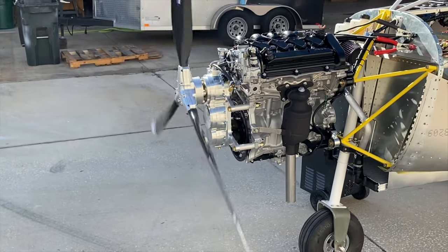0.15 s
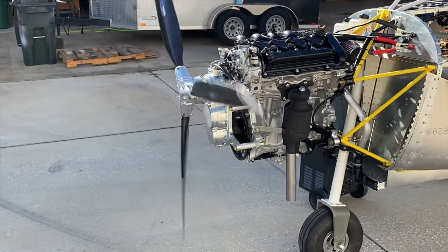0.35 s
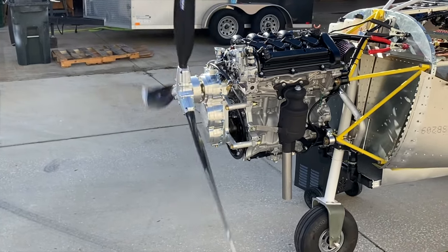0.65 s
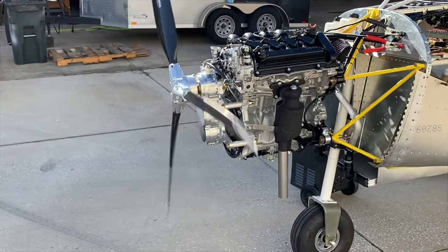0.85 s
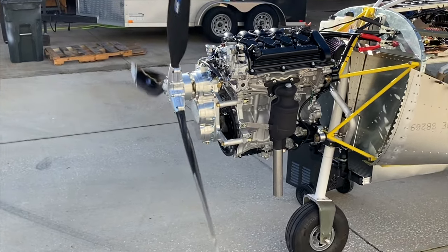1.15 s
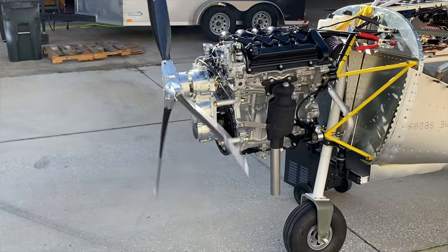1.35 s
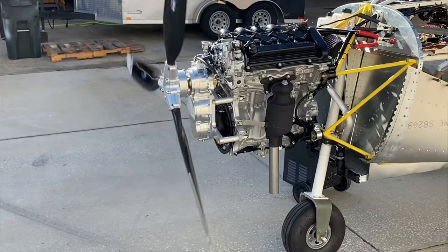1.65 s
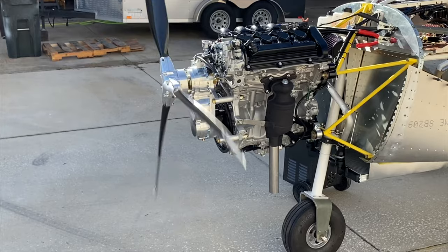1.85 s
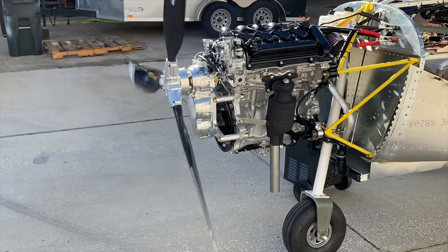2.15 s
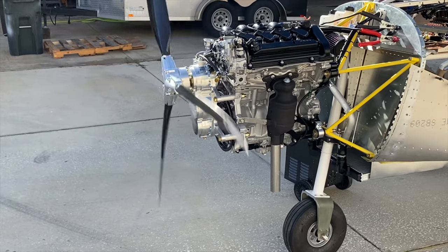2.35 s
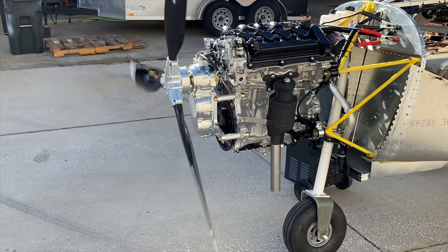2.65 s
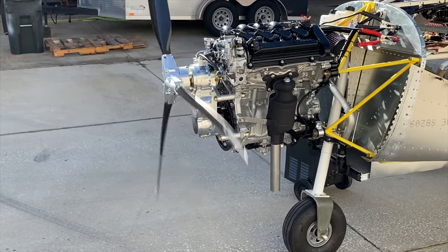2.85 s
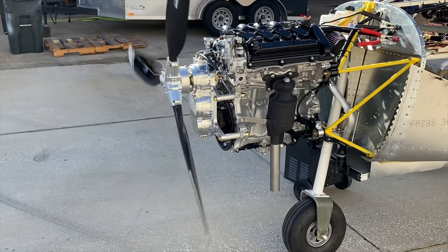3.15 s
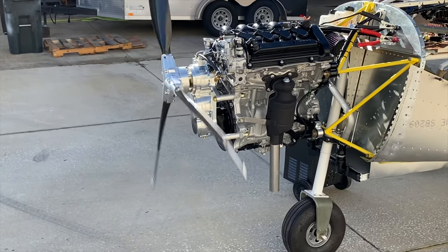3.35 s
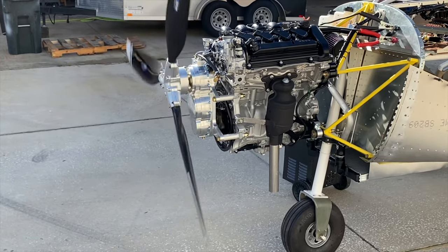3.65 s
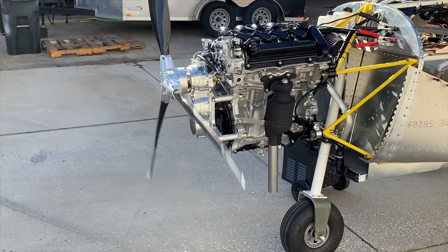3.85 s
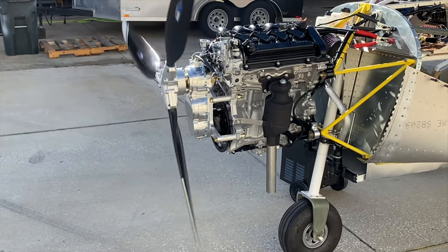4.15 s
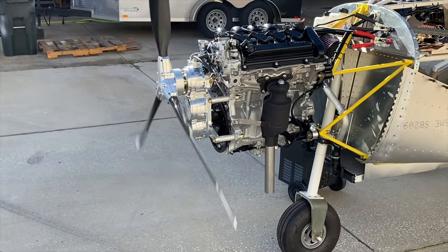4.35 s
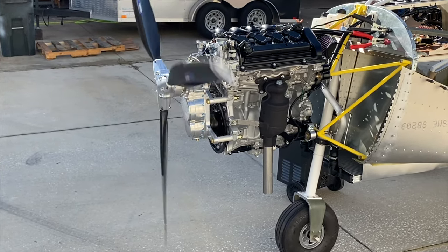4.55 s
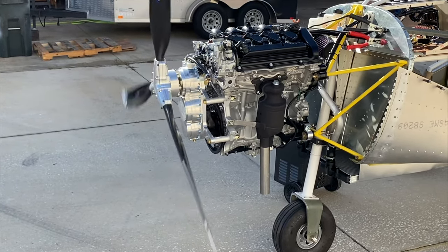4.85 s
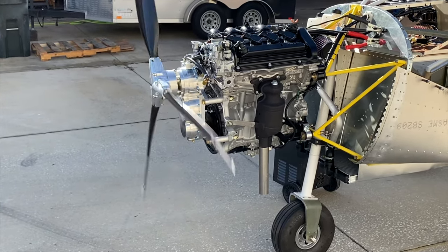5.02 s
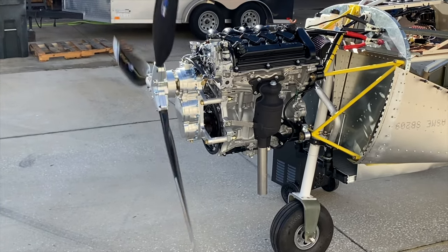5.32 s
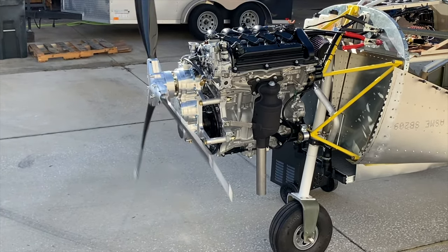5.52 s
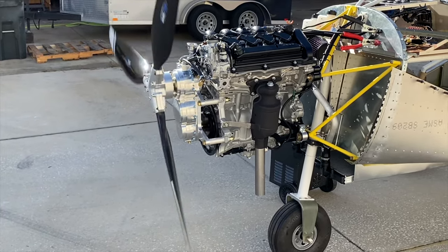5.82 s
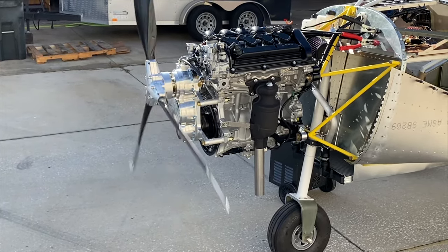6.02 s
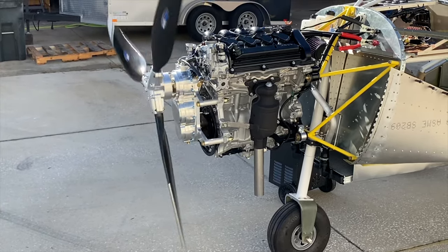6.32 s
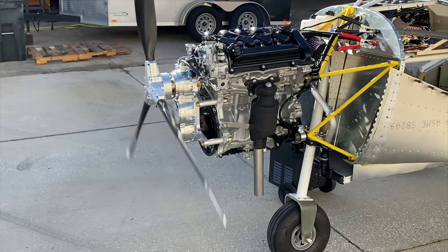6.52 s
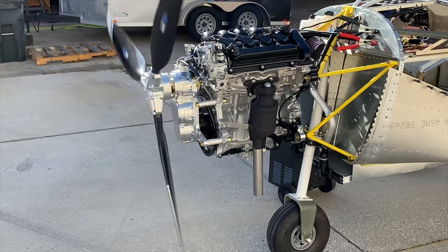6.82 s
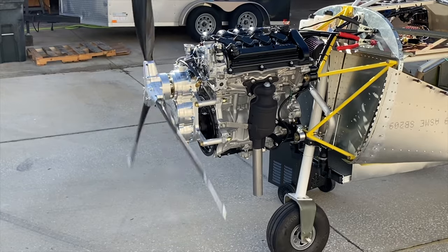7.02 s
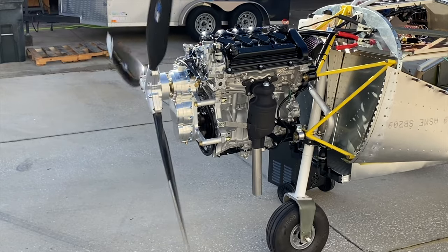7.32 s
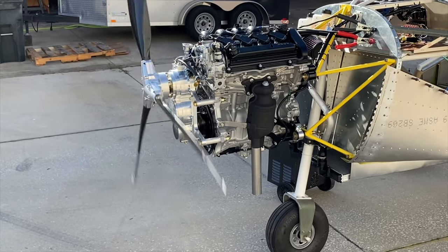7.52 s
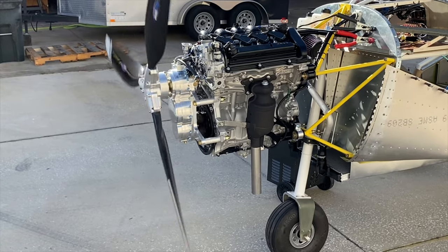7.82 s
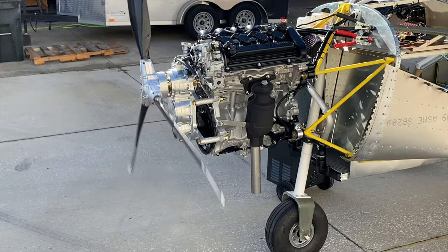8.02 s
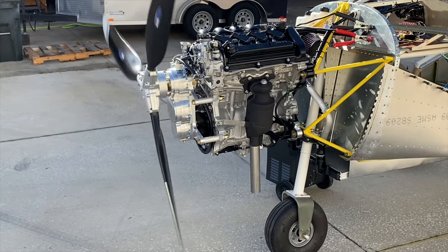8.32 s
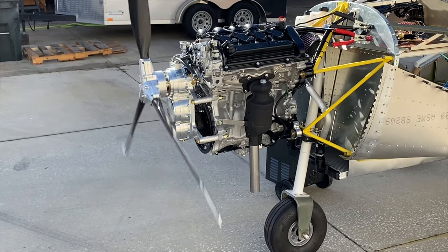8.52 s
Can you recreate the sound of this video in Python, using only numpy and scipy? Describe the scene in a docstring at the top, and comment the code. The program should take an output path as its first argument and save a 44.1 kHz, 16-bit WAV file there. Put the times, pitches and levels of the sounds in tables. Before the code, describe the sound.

From 0 to about 8.7 seconds, a geared four-cylinder aircraft engine idles without starting, revving or stopping, its speed hunting only very slightly. Exhaust pulses come at about 49 a second, fusing into a low, throaty drone with a strong octave and wavering upper hum, roughened by breathy gas bursts and uneven pulses. Above it runs dense metallic clatter: valves, rapid knocks, limping taps, hissy injector ticks, thin whines and a gear rasp stronger near 1.75 and 4 seconds. The three-blade propeller gives a fast, soft whoosh, weak buzz and steady rush of air, about 32 passes a second. A light gust near 1.1 seconds brings one low thump on the microphone; from 5.3 to 6.7 seconds a second brings a flurry of soft, bassy buffets. The idle then continues unchanged, close and dry, in stereo on an open concrete ramp.

```python
"""On a concrete ramp, a geared four-cylinder aircraft engine idles uncowled, turning a three-blade propeller.
The exhaust note is a sum of harmonics of the firing rate with bursts of gas noise and uneven pulses.
Valve train, gearbox and injectors are noise through metal resonances, and shaft tones whine.
The blades buzz and whoosh amid rushing air. Two light gusts cross the microphone:
the first brings one buffet, the second a flurry."""
import sys
import numpy as np
from scipy.fft import rfft, irfft, next_fast_len
from scipy.io import wavfile
from scipy.ndimage import map_coordinates

SR = 44100
rng = np.random.default_rng(int(sys.argv[2]) if len(sys.argv) > 2 else 0)


def output_pcm(signal):
    """Save a mono or channel-first signal as 16-bit PCM at the path in sys.argv[1].

    Samples are clipped to [-1, 1] before scaling.
    """
    pcm = np.clip(np.atleast_2d(signal).T, -1, 1) * 32767
    wavfile.write(sys.argv[1], SR, np.round(pcm).astype(np.int16))


N = 382347

# Cylinders in firing order. Each row: exhaust puff strength in dB, injector tick strength in dB.
CYLINDERS = [(-10, 1), (-3, 2), (-3, 5), (-2.5, 1)]
BLADES_PER_FIRING = .649


def amp(db):
    """Decibels to gain."""
    return 10 ** (np.asarray(db) / 20)


def unit(x):
    """Scale to rms 1."""
    return x / np.sqrt(np.mean(x ** 2) + 1e-20)


def along(points, hz):
    """Read (Hz, value) points on a log axis."""
    f, v = np.transpose(points)
    return np.interp(np.log(hz + 1), np.log(f + 1), v)


def curve(rows):
    """One value per sample from (seconds, value) points."""
    s, value = np.transpose(rows)
    return np.interp(np.arange(N) / SR, s, value)


def wobble(knots_per_s):
    """A smooth random curve."""
    return map_coordinates(rng.standard_normal(2000), [np.arange(N) * knots_per_s / SR], mode="mirror")


def creep(db_per_s):
    """A slow, even change of level in dB, zero halfway through."""
    return db_per_s * (np.arange(N) - N / 2) / SR


def filtered(x, response):
    """x times a complex response of frequency."""
    size = next_fast_len(N + SR // 2)
    spectrum = rfft(x, size) * response(np.fft.rfftfreq(size, 1 / SR))
    return irfft(spectrum, size)[..., :N]


def colour(points):
    """The response of a (Hz, dB) spectrum."""
    return lambda hz: amp(along(points, hz))


def resonance(hz, centre_hz, width_hz):
    """The causal response of one damped mode, 1 at its centre."""
    damping = 1j * hz * width_hz
    return damping / (centre_hz ** 2 - hz ** 2 + damping)


def noise():
    """Two unrelated white noises."""
    return rng.standard_normal((2, N))


def radiate(pair, response):
    """Colour two unrelated signals and blend them into left and right, rms 1."""
    # Left-right likeness. Each row: frequency in Hz, correlation.
    likeness = [(45, .985), (90, .97), (200, .965), (700, .945), (1050, .935), (1300, .88), (1580, .78),
                (1770, .05), (1950, .8), (2150, .97), (2450, .99), (2650, .98), (3300, .955), (3650, 1),
                (7000, 1), (8000, .93), (15000, .92)]

    def mid_side(hz):
        turn = np.arccos(np.clip(along(likeness, hz), -1, 1)) / 2
        return response(hz) * np.array([np.cos(turn), np.sin(turn)])

    mid, side = filtered(pair, mid_side)
    return unit(np.array([mid + side, mid - side]))


def lobe(turns, at, sharpness):
    """One smooth bump per turn, peaking at the given fraction of it."""
    return np.exp(sharpness * (np.cos(2 * np.pi * (turns - at)) - 1))


def strengths(firings, at, cylinder_db, scatter_db):
    """The gain of each firing: its cylinder's own strength, and chance."""
    index = np.round(firings - at).astype(int) + 2
    chance_db = scatter_db * rng.standard_normal(1000)[index]
    return amp(cylinder_db[index % len(cylinder_db)] + chance_db)


def strikes(turns, rows, scatter_db):
    """Once a turn, each row strikes a resonance of the metal with a gritty burst that dies away."""
    period_s = N / SR / (turns[-1] - turns[0])
    total = np.zeros((2, N))
    for at, centre_hz, width_hz, decay_s, db in rows:
        count, part = np.divmod(turns - at + 1, 1)
        size = amp(scatter_db * rng.standard_normal(1000)[count.astype(int)])
        bursts = noise() * size * np.exp(-part * period_s / decay_s)
        total += amp(db) * radiate(bursts, lambda hz: resonance(hz, centre_hz, width_hz) ** 2)
    return total


def gusts(lumpy_db=3):
    """A light breeze swells and fades, rumbling differently on each port."""
    # Gusts. Each row: middle in seconds, length in seconds, level in dB.
    gust_rows = [(1.102, 0.54, -35), (5.93, 1.3, -38.5)]
    # Wind rumble spectrum. Each row: frequency in Hz, density in dB per Hz.
    eddy_spectrum = [(15, -30), (45, -9), (75, 10), (130, -1), (220, -7), (320, -7), (500, -29),
                     (2000, -80)]
    s, length_s, db = np.transpose(gust_rows)[:, :, None]
    offset = 2 * (np.arange(N) / SR - s) / length_s
    swell = np.sum(amp(db) / (1 + offset ** 10), axis=0)
    return swell * unit(filtered(noise(), colour(eddy_spectrum)) * amp(lumpy_db * wobble(6.8)))


def buffets(push_cycles=0.7, flutter_width_s=.009):
    """Each eddy gives the microphone one round push and a short flutter above it."""
    # Eddies. Each row: time in seconds, push in dB, push frequency in Hz, flutter in dB.
    eddies = [(1.149, -14, 100, -35), (5.315, -13, 75, -25), (5.357, -9, 90, -23), (5.445, -14, 250, -19),
              (5.48, -9.5, 68, -35), (5.539, -16, 65, -33), (5.606, -17, 75, -28), (5.654, -19, 80, -35),
              (5.811, -11, 110, -25), (5.828, -12, 75, -25), (5.849, -15, 90, -27), (5.878, -16, 75, -28),
              (5.949, -16, 75, -22), (5.98, -14, 165, -27), (6.017, -10.5, 85, -33), (6.06, -18, 130, -32),
              (6.094, -14, 75, -28), (6.136, -11, 200, -23), (6.16, -15, 95, -30), (6.218, -13, 70, -27),
              (6.285, -22, 70, -21), (6.327, -11, 80, -28), (6.45, -17, 60, -28), (6.464, -17, 80, -19),
              (6.511, -16, 55, -23), (6.527, -18, 90, -24), (6.726, -12, 195, -33)]
    # Flutter spectrum. Each row: frequency in Hz, density in dB per Hz.
    flutter_spectrum = [(50, -16), (130, 0.5), (230, -1), (310, -12), (520, -20), (2000, -75)]
    pushes, swell = np.zeros(N), np.zeros(N)
    for s, push_db, hz, flutter_db in eddies:
        near = slice(int(s * SR) - SR // 10, int(s * SR) + SR // 10)
        t = np.arange(near.start, near.stop) / SR - s
        pushes[near] -= amp(push_db) * np.cos(2 * np.pi * hz * t) * np.exp(-(hz * t / push_cycles) ** 2)
        swell[near] += amp(flutter_db) / (1 + (t / flutter_width_s) ** 2)
    return pushes + swell * radiate(noise(), colour(flutter_spectrum))


def rumble(rumble_db=-44):
    """Air stirred by the propeller rumbles faintly below the exhaust note."""
    # Stirred air. Each row: frequency in Hz, density in dB per Hz.
    air_spectrum = [(8, -10), (16, 2), (30, 0), (45, -10), (80, -30), (300, -80)]
    return amp(rumble_db) * radiate(noise(), colour(air_spectrum))


def wash(firings, wash_db=-28.0, blade_db=1.0, cam_db=0.58, unrest_db=0.4):
    """Rushing air and sliding parts, swelling with each blade and each camshaft turn."""
    # Wash spectrum. Each row: frequency in Hz, density in dB per Hz.
    wash_spectrum = [(60, -15), (250, 1), (550, -2.5), (1000, -0.5), (1500, -9.5), (1800, -8),
                     (2700, -12.5), (4000, -13), (5000, -14.5), (7500, -15.5), (10000, -20), (12500, -29),
                     (14000, -22.5), (15500, -14)]
    blades = blade_db * np.cos(2 * np.pi * (BLADES_PER_FIRING * firings - .92))
    cam = cam_db * np.cos(2 * np.pi * (firings / len(CYLINDERS) - .6))
    return amp(wash_db + blades + cam + unrest_db * wobble(7)) * radiate(noise(), colour(wash_spectrum))


def blade_chop(firings, chop_db=-35):
    """Each blade throws a soft, low whoosh of air."""
    # Whoosh spectrum. Each row: frequency in Hz, density in dB per Hz.
    whoosh_spectrum = [(70, -23), (170, -2.5), (330, 0.5), (480, -15.5), (1500, -45)]
    passes = lobe(BLADES_PER_FIRING * firings, at=0.67, sharpness=1.7)
    return amp(chop_db) * radiate(noise() * passes, colour(whoosh_spectrum))


def propeller(firings, hum_db=-43, fall_db=1.1, waver_db=2, count=8):
    """Each passing blade pushes the air: a weak buzz whose harmonics beat against the exhaust note."""
    angle = 2 * np.pi * BLADES_PER_FIRING * firings
    buzz = np.zeros(N)
    for k in range(count):
        level_db = hum_db - fall_db * k + waver_db * wobble(4)
        buzz += amp(level_db) * np.cos((k + 2) * angle)
    return np.sqrt(2) * buzz


def injectors(firings, tick_db=-43.3, scatter_db=2):
    """A short hiss at every firing, between the exhaust puffs, and three ringing clicks per cycle."""
    # Tick spectrum. Each row: frequency in Hz, density in dB per Hz.
    tick_spectrum = [(1000, -30), (2500, 0), (5000, 1), (8000, 1.5), (12500, -8), (15500, 4.5)]
    # Clicks. Each row: fraction of the four-stroke cycle, pitch in Hz, width in Hz, decay in seconds,
    # level in dB before the treble curve.
    clicks = [(.15, 7600, 1500, 0.0033, -57), (.375, 9900, 1400, 0.0033, -57.5),
              (.875, 7930, 700, 0.0037, -55.5)]
    size = strengths(firings, .6, np.transpose(CYLINDERS)[1], scatter_db=2.0)
    ticks = noise() * size * lobe(firings, at=0.61, sharpness=2.6)
    hiss = amp(tick_db) * radiate(ticks, colour(tick_spectrum))
    return hiss + strikes(firings / len(CYLINDERS), clicks, scatter_db)


def whines(firings, waver_db=3, drift_rad=0.57):
    """Shaft, chain and gear tones, locked to the four-stroke cycle, waver in level and phase."""
    # Tones. Each row: multiple of the firing rate (rounded to whole cycles below), level in dB.
    tones = [(4.5, -57), (6.5, -51), (7.5, -45), (11, -48), (15.5, -51.5), (24.5, -51), (26, -50.5),
             (38.5, -56.5), (40, -53.5), (53.25, -55), (66.75, -58)]
    total = np.zeros(N)
    for k, db in tones:
        multiple = round(k * len(CYLINDERS)) / len(CYLINDERS)
        level = amp(db + waver_db * wobble(6))
        total += level * np.sin(2 * np.pi * multiple * firings + drift_rad * wobble(12))
    return np.sqrt(2) * total


def case(hz):
    """The causal response of the ringing block and gear case."""
    # Resonances. Each row: frequency in Hz, width in Hz, gain in dB.
    modes = [(391, 101, -1), (763, 232, -3.5), (1282, 170, -4), (1484, 84, -0.5), (1614, 108, -5),
             (1960, 145, -11), (2380, 225, -13), (2670, 163, -10.5), (3170, 690, -18)]
    return sum((-1) ** k * amp(db) * resonance(hz, c, w) for k, (c, w, db) in enumerate(modes))


def clatter(firings, clatter_db=-27.5, repeating=0.43, rattle=0.56, load_db=0.2, chatter_db=1.1, valve_db=.5):
    """Valves and gear teeth strike the case: partly the same every cycle, partly a dense loose rattle."""
    cycle = firings / len(CYLINDERS)
    length = int(N / (cycle[-1] - cycle[0]))  # samples in a mean cycle
    pattern = rng.standard_normal((2, length))
    valves = np.array([map_coordinates(p, [cycle % 1 * length], mode="grid-wrap") for p in pattern])
    knocks = unit((rng.random(N) < 900 / SR) * rng.uniform(-0.87, 1, (2, N)))  # 900 a second
    # each passing blade loads the gear teeth, which chatter in clusters
    blade_load = load_db * np.cos(2 * np.pi * (BLADES_PER_FIRING * firings - .35))
    load = amp(blade_load + chatter_db * wobble(45))
    # the valves seat in a quick ripple, three swells to a firing
    seating = amp(valve_db * np.cos(2 * np.pi * 3 * firings - 2))
    blows = repeating * valves + rattle * knocks + 0.56 * noise()
    return amp(clatter_db) * radiate(load * seating * blows, case)


def block_knocks(firings, scatter_db=2):
    """Combustion jolts the block twice in every firing, a fine, fast rap under the clatter."""
    # Knocks. Each row: fraction of the firing period, frequency in Hz, width in Hz, decay in seconds,
    # level in dB.
    knock_rows = [(.21, 1450, 420, .0018, -44), (.66, 1430, 420, .0015, -45)]
    return strikes(firings, knock_rows, scatter_db)


def valve_taps(firings, scatter_db=2):
    """A few valves tap louder than the rest, a quick limping tick at camshaft speed."""
    # Taps. Each row: fraction of the four-stroke cycle, frequency in Hz, width in Hz, decay in seconds,
    # level in dB.
    tap_rows = [(.15, 1260, 220, 0.0037, -45), (.16, 2810, 550, 0.0034, -53),
                (.29, 1304, 220, 0.0064, -47.5), (0.479, 2150, 450, 0.0058, -54),
                (.595, 3300, 960, 0.0058, -50.5), (.62, 2200, 500, .005, -51),
                (0.641, 730, 260, 0.0047, -44)]
    return strikes(firings / len(CYLINDERS), tap_rows, scatter_db)


def gear_rasp(firings, scatter_db=3.0):
    """The load of each passing blade rattles the gear teeth through their play, twice a blade."""
    # Rasps. Each row: fraction of the blade period, frequency in Hz, width in Hz, decay in seconds,
    # level in dB before the curve below.
    rasp_rows = [(.06, 1298, 280, 0.016, -40.5), (.36, 1545, 240, 0.0067, -42)]
    # The rasp comes and goes. Each row: time in seconds, level in dB.
    rasp_curve = [(0, -2), (1.35, 0), (1.75, 5), (2.1, 0), (2.65, 0.5), (3.9, 4), (4.55, 1), (5, -3.5),
                  (5.5, -1), (5.9, 2), (7.05, -1), (7.5, 1), (8.67, -5)]
    return amp(curve(rasp_curve)) * strikes(BLADES_PER_FIRING * firings, rasp_rows, scatter_db)


def exhaust_puffs(firings, puff_db=-27.0, rise_db_per_s=0.17, pulsing=0.6, muffler_hz=170, muffler_delay_s=.002):
    """Turbulent gas leaves the pipe with each pulse; its lows linger in the muffler."""
    # A main and a weaker puff per firing. Each row: fraction of the firing period, share.
    puff_rows = [(-.24, 1), (.4, .5)]
    # Gas noise spectrum. Each row: frequency in Hz, density in dB per Hz.
    puff_spectrum = [(15, -20), (35, -16), (60, 0), (80, 2), (120, 0), (170, -2.5), (300, -4), (450, -7.5),
                     (800, -17), (2000, -31)]
    size = strengths(firings, puff_rows[0][0], np.transpose(CYLINDERS)[0], scatter_db=3.5)
    bumps = sum(share * lobe(firings, at, sharpness=2.6) for at, share in puff_rows)
    gate = 1 + pulsing * size * bumps

    def muffler(hz):
        lag_cycles = muffler_delay_s * muffler_hz * np.arctan(hz / muffler_hz)
        return colour(puff_spectrum)(hz) * np.exp(-2j * np.pi * lag_cycles)

    return amp(puff_db + creep(rise_db_per_s)) * radiate(noise() * gate, muffler)


def stumble(firings, stumble_db=-35):
    """No two pulses are quite alike in strength, which fills the bass between the harmonics."""
    # Uneven part of the pulses. Each row: frequency in Hz, gain in dB.
    uneven_spectrum = [(15, -20), (45, -10), (78, -0.5), (110, -6), (170, -1), (400, -10)]
    size = np.log(strengths(firings, -.3, np.zeros(len(CYLINDERS)), scatter_db=1))
    pulses = size * lobe(firings, at=-0.13, sharpness=4)
    return amp(stumble_db) * unit(filtered(pulses, colour(uneven_spectrum)))


def exhaust_note(firings, tone_db=-22.0, flutter_db=0.26, waver_db=2, growth_db_per_s=0.2):
    """Every firing sends one pressure pulse down the pipe; its upper harmonics drift in and out of step."""
    # Slow swell of the second harmonic. Each row: time in seconds, level in dB.
    octave_curve = [(0.0, -21.5), (1.0, -22), (2.2, -21), (3.6, -23.5), (4.7, -19), (5.8, -23),
                    (6.5, -22.5), (7.8, -18), (8.67, -23.5)]
    # Fourth harmonic, a hum near 200 Hz. Each row: time in seconds, level in dB.
    fourth_curve = [(0, -33), (.4, -31.5), (.8, -33.5), (1.2, -31.5), (1.7, -35), (2.3, -37), (2.7, -33),
                    (3.3, -33.5), (4, -32.5), (4.7, -35), (5.2, -33.5), (5.8, -35.5), (6.7, -34),
                    (7.2, -35.5), (8.4, -30)]
    # Wavering harmonics. Each row: multiple of the firing rate, level in dB halfway through,
    # phase wander in radians.
    overtones = [(3, -34.5, 1.4), (5, -33.2, .4), (6, -35, 1.1), (7, -41.5, 2.3), (8, -45, 1.2),
                 (9, -47, 2)]
    angle = 2 * np.pi * firings
    lead = np.pi / 4  # a shared phase lead makes each pulse lopsided
    low = amp(tone_db + .8 * wobble(13)) * np.cos(angle + lead)
    middle = amp(curve(octave_curve) + flutter_db * wobble(18)) * np.cos(2 * angle + np.pi / 3)
    hum = amp(curve(fourth_curve) + waver_db * wobble(6)) * np.cos(4 * angle + lead)
    high = np.zeros(N)
    for k, db, wander_rad in overtones:
        level = amp(db + waver_db * wobble(9))
        high += level * np.cos(k * angle + lead + wander_rad * wobble(6))
    return -np.sqrt(2) * (low + middle + hum + amp(creep(growth_db_per_s)) * high)


def scene():
    """One crankshaft drives every part; the breeze plays on the microphone."""
    # Idle speed, hunting slightly. Each row: time in seconds, rate in firings per second.
    idle = [(0.0, 49.11), (0.5, 48.95), (1.2, 49.15), (1.7, 49.39), (2.3, 49.4), (2.8, 49.09), (3.5, 49.31),
            (4.5, 48.76), (5.5, 49.17), (6.4, 49.17), (6.8, 49.36), (7.4, 49.56), (7.8, 49.14),
            (8.67, 49.09)]
    # Treble level. Each row: time in seconds, level in dB.
    treble_curve = [(0, -1), (.6, -0.5), (1.3, -1.5), (1.8, 0), (3.1, -1), (3.9, .7), (4.6, 0), (5.1, -0.7),
                    (6.1, .3), (6.6, -0.6), (7.5, 0.1), (8.67, -0.3)]
    firings = .3 + np.cumsum(curve(idle)) / SR  # running count, with the starting phase
    air = gusts() + buffets() + rumble() + blade_chop(firings) + propeller(firings)
    treble = amp(curve(treble_curve)) * (wash(firings) + injectors(firings))
    gears = whines(firings) + gear_rasp(firings)
    engine = clatter(firings) + block_knocks(firings) + valve_taps(firings)
    exhaust = exhaust_puffs(firings) + stumble(firings) + exhaust_note(firings)
    return air + treble + gears + engine + exhaust


def record(dry, low_cut_hz=30, top_hz=15800):
    """Two microphone ports, a low cut, and the recorder's band limit."""
    # Port phase: lows nearly together, top treble apart. Each row: frequency in Hz, left lead in radians.
    port_phase = [(0, 0), (100, -.08), (500, -.17), (1100, 0), (6800, 0), (7050, -.25), (7450, -.42),
                  (7750, -1.6), (8100, -1.9), (8520, -3.14), (9040, -4.6), (9900, -6.2), (10300, -6.4),
                  (12050, -9.42), (13600, -12.3), (14300, -12.8), (15750, -15.7)]
    # Port balance. Each row: frequency in Hz, left minus right in dB.
    balance = [(50, -.1), (300, -.3), (560, .2), (780, -1.5), (1200, -1), (1550, 2), (1820, -2), (2100, 0)]
    sides = np.array([[.5], [-.5]])

    def response(hz):
        lead_rad = np.interp(hz, *np.transpose(port_phase))
        ports = np.exp(1j * sides * lead_rad) * amp(sides * along(balance, hz))
        low_cut = 1 - np.exp(-(hz / low_cut_hz) ** 2)
        return ports * low_cut * (hz < top_hz)

    return filtered(dry, response)


dry = scene()
out = record(dry)
output_pcm(out)
```